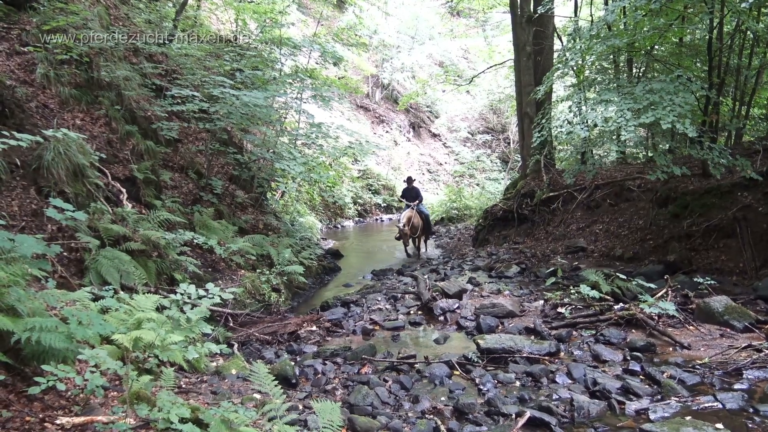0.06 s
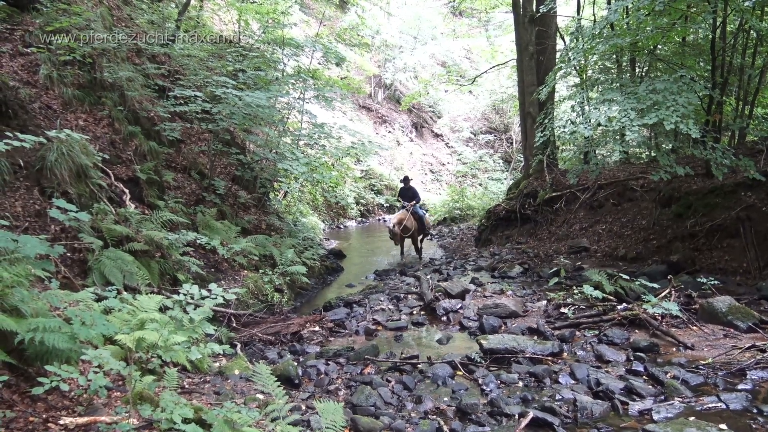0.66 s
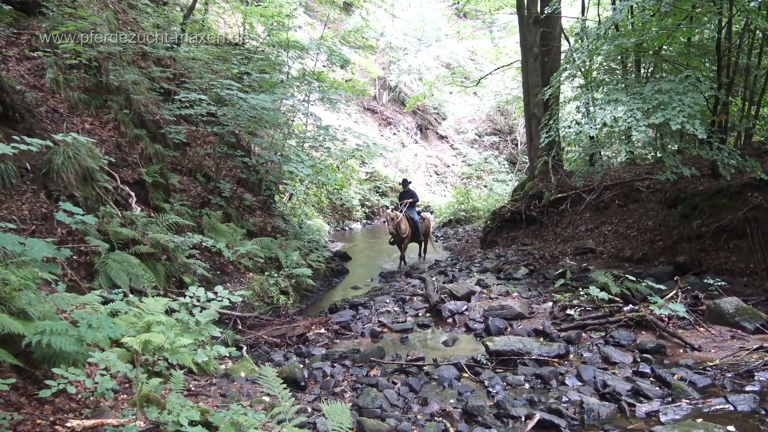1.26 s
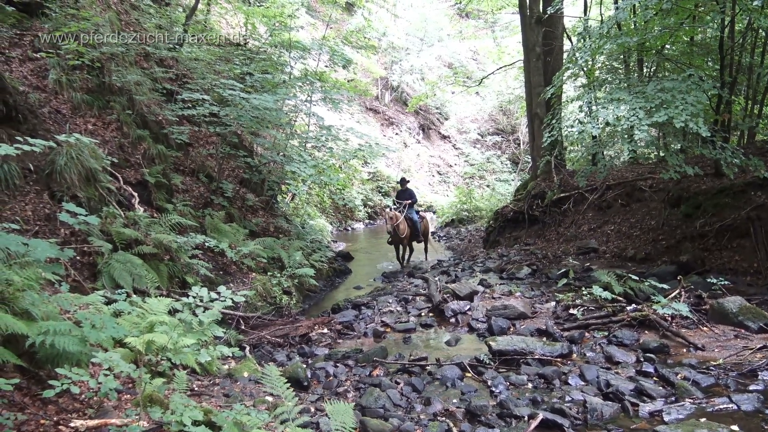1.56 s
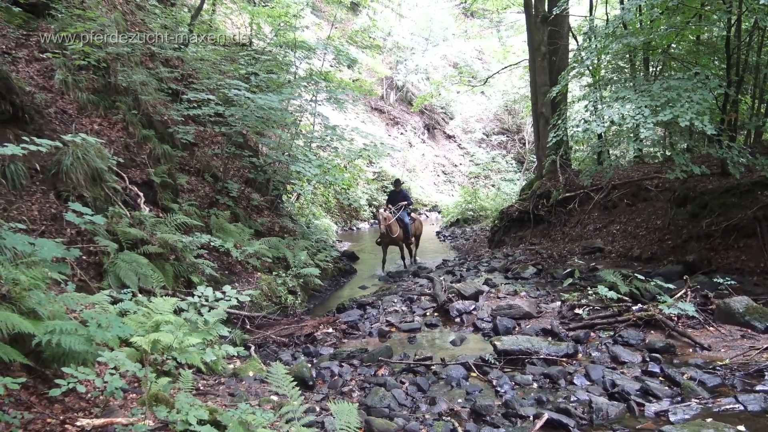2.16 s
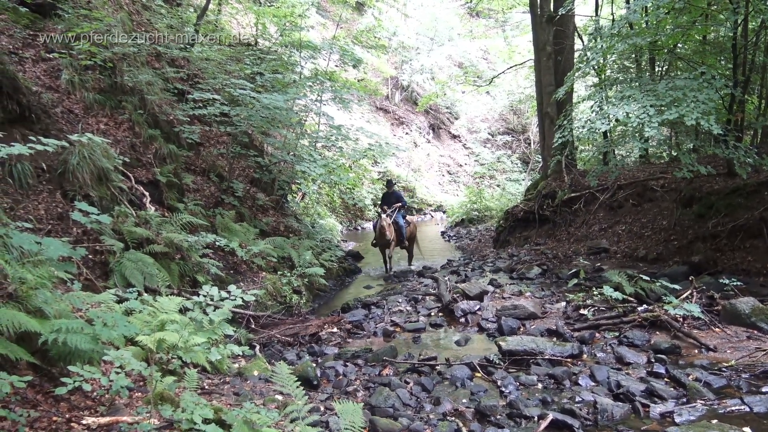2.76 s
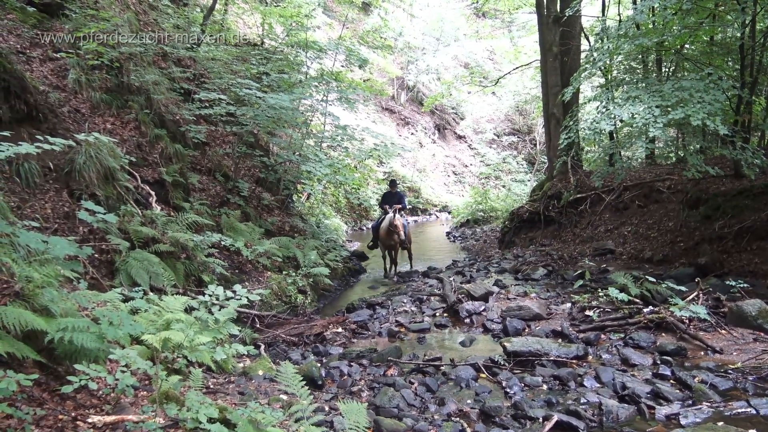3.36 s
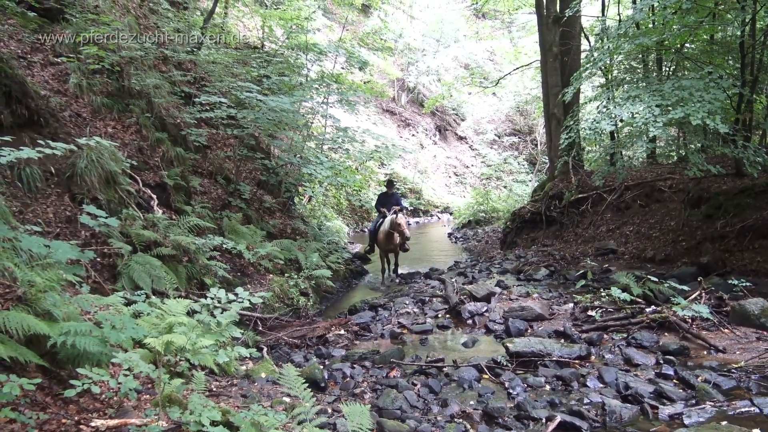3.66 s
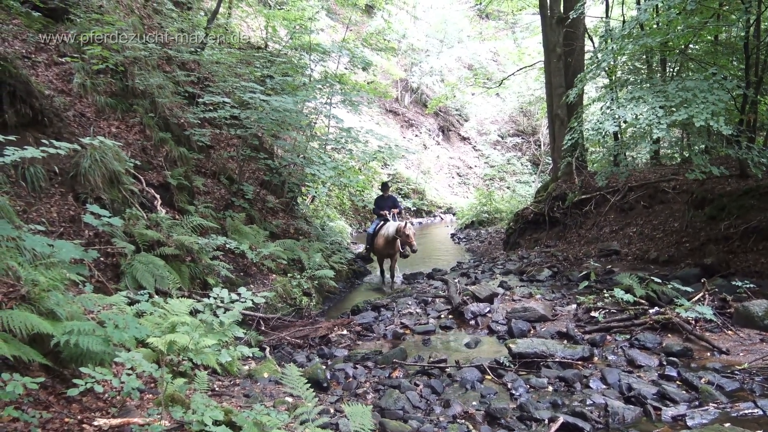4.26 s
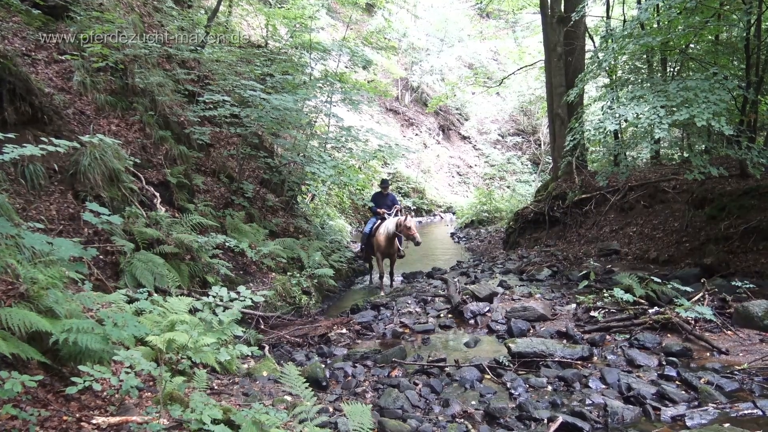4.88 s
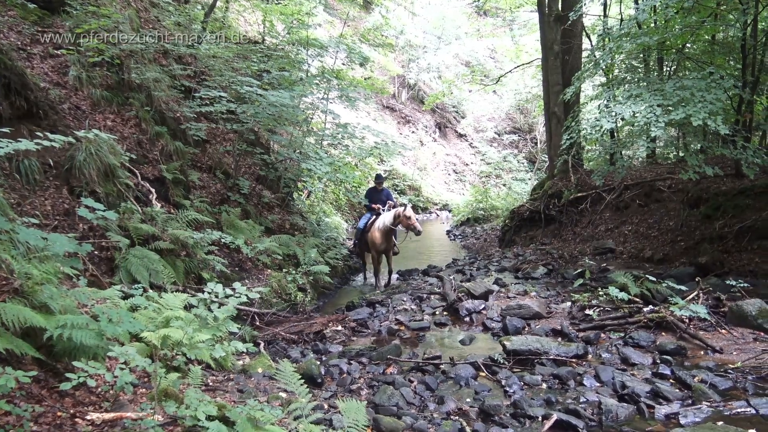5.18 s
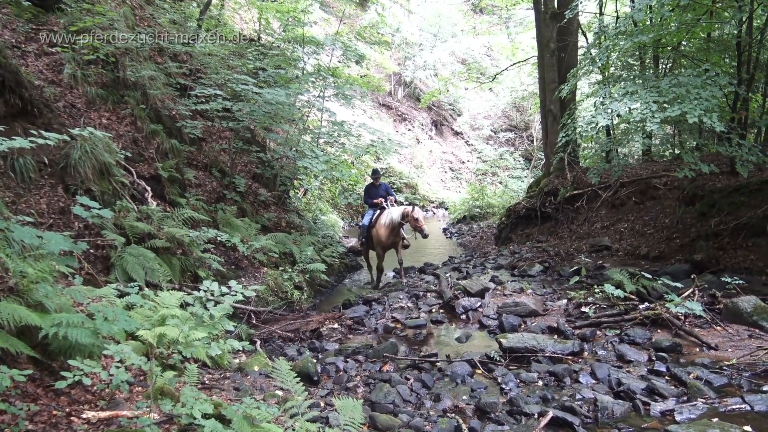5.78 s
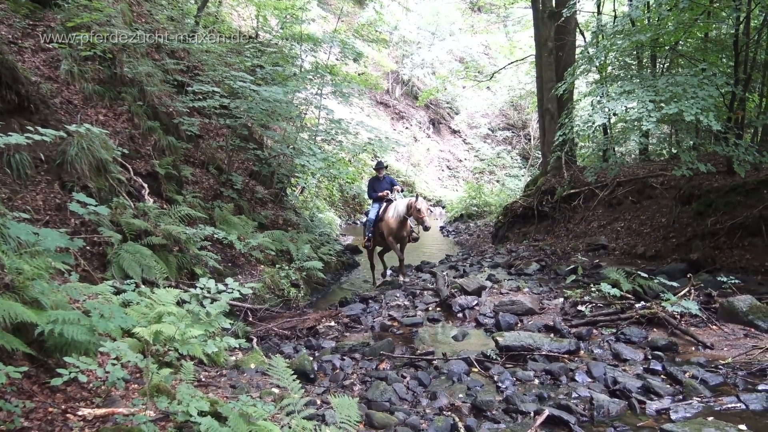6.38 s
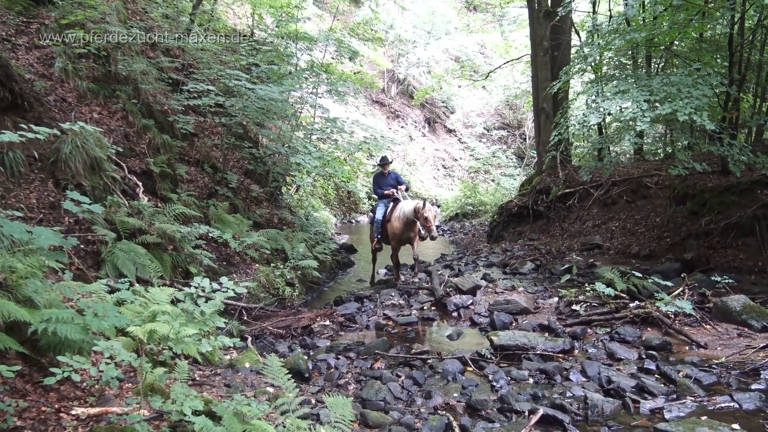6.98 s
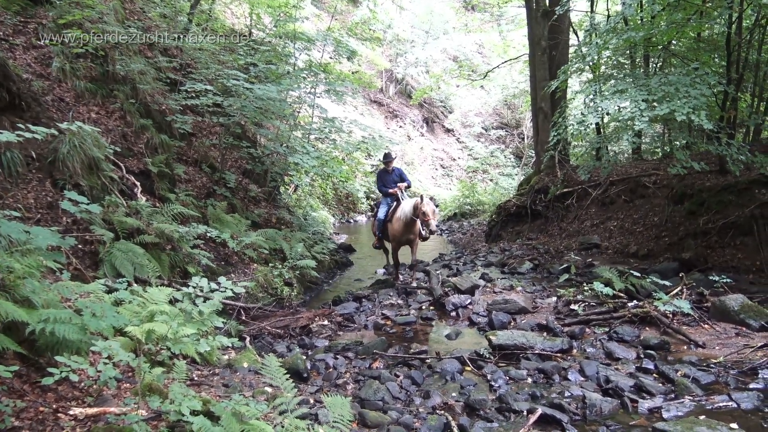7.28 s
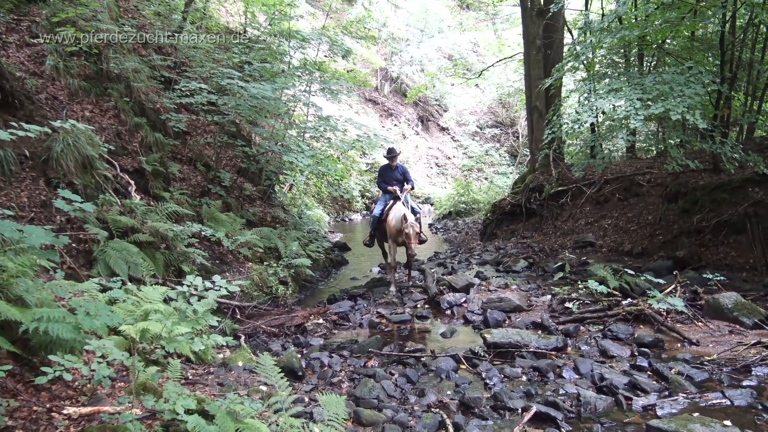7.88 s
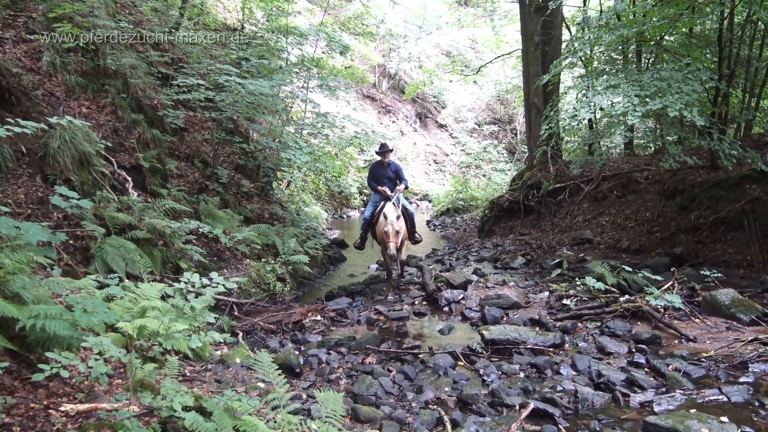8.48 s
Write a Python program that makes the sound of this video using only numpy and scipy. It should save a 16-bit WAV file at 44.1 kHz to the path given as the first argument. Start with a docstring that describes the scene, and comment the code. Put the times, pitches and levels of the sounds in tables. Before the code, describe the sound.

A horse wades through a shallow stream in a wooded ravine, each step sloshing, gurgling and throwing a hiss of drops. Occasional hoof knocks come through the splashes, then grow frequent as it steps onto wet stones. Near the end a shoe strikes rock with one loud, bright crack that rings briefly off the banks. Water trickles softly underneath, all heard in fairly narrow stereo.

```python
"""Splashing, gulping steps: a horse wades down a shallow stream in a wooded ravine, then onto wet stones.
Each leg plunges air under the water, churns up ringing bubbles and sheds a spray of drops.
Hooves knock on the stream bed, most often near the end, where one shoe strikes a rock with a bright
crack that rings round the banks. The stream trickles underneath it all."""
import sys
import numpy as np
from scipy import signal
from scipy.fft import rfft, irfft
from scipy.io import wavfile

SR = 44100
rng = np.random.default_rng(int(sys.argv[2]) if len(sys.argv) > 2 else 0)


def generate_wav(signal):
    """Clip the signal to [-1, 1] and save it as 16-bit WAV at the path in sys.argv[1]."""
    frames = np.transpose(np.atleast_2d(signal))
    scaled = np.clip(frames, -1, 1) * 32767
    pcm = np.round(scaled).astype(np.int16)
    wavfile.write(sys.argv[1], SR, pcm)


N = 385434

# Levels in the tables are relative. A fade time (t60) is how long a sound takes to drop by 60 dB.
# A leg drives air under. Each row: start and length in seconds, level in dB, middle bubble pitch in Hz.
PLUNGES = [(0.467, 0.045, -39.5, 384), (0.917, 0.051, -44, 458), (0.989, 0.059, -37, 303),
           (1.049, 0.057, -49, 166), (1.276, 0.028, -41, 505), (1.36, 0.13, -50, 264),
           (1.673, 0.12, -43.5, 533), (2.158, 0.05, -41, 536), (2.471, 0.045, -41.5, 840),
           (2.556, 0.086, -38, 556), (2.605, 0.04, -43, 161), (2.854, 0.028, -42, 490),
           (2.887, 0.089, -39.5, 690), (2.972, 0.02, -47, 220), (3.136, 0.038, -44, 565),
           (3.293, 0.051, -41, 240), (3.564, 0.1, -42.5, 560), (3.62, 0.022, -46, 171),
           (3.756, 0.051, -43.5, 600), (3.79, 0.029, -50, 191), (4.153, 0.037, -47, 330),
           (4.209, 0.15, -39.5, 414), (4.798, 0.035, -41.5, 335), (5.23, 0.027, -37, 477),
           (5.577, 0.029, -42.5, 275), (5.934, 0.033, -37.5, 378), (6.551, 0.028, -45, 198),
           (7.153, 0.045, -40.5, 804), (7.509, 0.057, -38.5, 1090), (7.762, 0.051, -47, 412),
           (8.168, 0.042, -42.5, 990), (8.451, 0.052, -48, 476)]
# Single large bubbles. Each row: start in seconds, level in dB, pitch in Hz.
PLOPS = [(0.154, -31, 1800), (0.432, -30, 1960), (0.466, -24.5, 320), (0.473, -35, 490), (0.487, -27, 895),
         (0.502, -25, 890), (0.592, -30, 1020), (0.816, -30, 1630), (0.926, -30, 1790), (0.997, -28, 304),
         (1.016, -29, 340), (1.285, -31.5, 800), (1.679, -30, 492), (1.733, -27, 493), (1.756, -33, 278),
         (1.994, -29, 1500), (2.0, -32, 2680), (2.163, -28.5, 383), (2.193, -31, 940), (2.583, -28, 550),
         (2.585, -33, 770), (2.606, -29, 620), (2.611, -31, 810), (2.627, -24, 2540), (2.631, -30, 2900),
         (2.897, -30.5, 710), (2.899, -30, 915), (2.902, -28, 550), (3.144, -30, 1735), (3.285, -29, 342),
         (3.413, -32, 1020), (3.608, -29, 740), (3.618, -26.5, 4260), (3.655, -33, 440),
         (4.161, -32.5, 278), (4.205, -30, 231), (4.224, -26.5, 230), (4.24, -30, 345), (4.254, -30, 1735),
         (4.257, -27, 1155), (4.279, -29, 598), (4.333, -30, 217), (4.654, -31.5, 1030), (4.76, -32, 1610),
         (4.838, -30, 1780), (4.848, -32.5, 960), (4.985, -34, 1125), (5.117, -36.5, 383),
         (5.407, -36, 1030), (5.537, -32.5, 2090), (5.584, -31.5, 238), (5.63, -32.5, 1900),
         (5.823, -36.5, 1800), (5.945, -28, 302), (7.808, -32.5, 274)]
# Splats and ticks of water. Each row: start in seconds, level in dB, fade time in seconds,
# extra brightness in dB per octave.
SPLATS = [(0.817, -36, 0.19, -2.5), (1.481, -29, 0.016, 3), (1.995, -37.5, 0.095, 4), (2.901, -34, .06, 4),
          (3.142, -38, 0.12, 4), (3.979, -28.5, 0.068, 4), (4.024, -32.5, 0.049, 3.5),
          (4.237, -29.5, 0.3, 0), (4.511, -27.5, 0.06, 5.5), (5.102, -43, 0.08, 6),
          (5.178, -28.5, 0.035, 12.5), (5.235, -31.5, 0.11, -5), (5.945, -35.5, 0.35, 4.5),
          (5.59, -40, 0.09, 7), (6.88, -39, 0.03, 9), (7.621, -29.5, 0.04, 1), (8.174, -33, 0.087, 7),
          (8.255, -32.5, 0.022, 18), (8.463, -40, 0.1, 4)]
# A leg sweeps through the water. Each row: start, swell time and spray fade time in seconds,
# then spray level and bubble level in dB.
STRIDES = [(-0.198, 0.097, 1.6, -41, -43.5), (0.132, 0.2, 1.05, -39.5, -45), (0.41, 0.054, 2.3, -41.5, -39),
           (0.69, 0.2, 1.5, -42.0, -48.5), (0.932, 0.1, 2.9, -41.5, -44), (1.5, 0.15, 1.8, -42.5, -45.5),
           (1.947, 0.12, 1.6, -43, -45), (2.143, 0.06, 0.67, -41, -46), (2.362, 0.12, 3.2, -42, -46.5),
           (2.657, 0.083, 3.8, -44.0, -60), (2.832, 0.097, 0.62, -47, -43.5),
           (3.062, 0.11, 1.35, -43.5, -42.5), (3.303, 0.148, 2.9, -43.5, -49),
           (3.561, 0.058, 0.62, -42, -44), (3.76, 0.18, 3.4, -44, -44), (3.975, 0.027, 1.5, -42.5, -58.0),
           (4.224, 0.021, 1.77, -36, -40), (4.505, 0.012, 2.54, -37.5, -42.5),
           (5.174, 0.037, 0.68, -37, -48), (5.384, 0.02, 1.1, -45, -53), (5.57, 0.016, 1.65, -44, -63),
           (5.93, 0.019, 0.8, -39.5, -55), (6.376, 0.17, 0.59, -48.5, -52),
           (6.697, 0.029, 0.35, -48.5, -69), (6.798, 0.08, 1.5, -48, -54), (7.144, 0.025, 3.4, -46.5, -51),
           (7.333, 0.057, 0.93, -45, -38), (7.459, 0.097, 0.67, -37, -50), (8.15, 0.037, 0.65, -42, -39.5),
           (8.402, 0.09, 0.31, -45.5, -48)]
# A hoof lands on stone. Each row: start in seconds, knock level in dB, hoof pitch in Hz,
# then the levels of the bed's thud and the stone's clack in dB.
KNOCKS = [(1.289, -44, 840, -33.5, -50), (2.067, -31, 1100, -40, -23.5), (2.166, -31, 925, -38, -23.5),
          (4.093, -38, 830, -36, -27), (4.209, -26, 925, -38, -35), (4.453, -41, 665, -29.5, -50),
          (4.511, -28, 960, -28.5, -20), (4.805, -34, 996, -33.5, -33), (5.1, -33.5, 1330, -42, -33),
          (5.234, -39, 635, -40, -34), (5.906, -42, 950, -32.5, -38), (6.549, -25, 1000, -31.5, -38),
          (6.716, -33, 930, -27.5, -31), (6.816, -29, 990, -44, -27), (7.034, -39, 617, -32, -32),
          (7.045, -25.5, 910, -35, -23.5), (7.146, -28, 1010, -36, -35), (7.156, -27.5, 980, -40, -35),
          (7.169, -28.5, 940, -55, -42), (7.251, -27.5, 1040, -49, -26), (7.27, -29.5, 1030, -43, -32),
          (7.301, -34, 1140, -44, -26), (7.401, -19.5, 1030, -39, -28), (7.545, -27.5, 990, -40, -26),
          (7.623, -35, 1020, -61, -30), (7.752, -22, 940, -37, -28), (7.761, -22, 780, -29, -17.5),
          (8.068, -33, 860, -38, -28.5), (8.161, -28, 1180, -37, -33), (8.199, -26.5, 1150, -51, -24),
          (8.285, -38, 1070, -55, -30), (8.451, -30, 1130, -34, -30.5)]
# A shoe cracks on a rock. Each row: start in seconds, level in dB.
CRACKS = [(7.8641, -9.5)]
# The notes of a struck stone and of the crack. Each row: pitch in Hz, level in dB, fade time in seconds.
STONE_NOTES = [(1514, 1.5, 0.027), (1766, 4, .028), (1920, -5, 0.024), (2670, 1, 0.017), (3340, -11, 0.013)]
CRACK_NOTES = [(2880, 0, .014), (3110, -1, .013), (3430, -1.5, .012), (3690, -8, .011)]
# The tone colour of each sound. Each row: frequency in Hz, level in dB.
SLOSH_TONE = [(60, -3), (140, -1), (400, -5), (700, -5.5), (980, 2.5), (1300, -13), (1750, -10),
              (2400, -24), (6000, -28)]
SPLAT_TONE = [(100, -11), (400, 7.5), (1800, 8), (5000, 1), (10000, -9.5), (15000, -20)]
SPRAY_TONE = [(400, -15), (1000, -4.5), (1700, 1), (2250, 0), (2900, 0), (4200, -2.5), (5500, -2.5),
              (7500, -5.5), (10000, -8), (12500, -11.5), (15800, -15)]
CHURN_TONE = [(120, -6.5), (250, -6), (400, -2), (600, -2.5), (1000, 1), (1280, -7), (1750, 2), (2250, -11),
              (3000, -8), (5000, -30.5)]
SCRAPE_TONE = [(300, -48), (1000, -35), (1650, 1), (1900, -3), (2200, -7), (2800, -7), (4000, -5),
               (12000, -15)]
TICK_TONE = [(200, -14), (1000, 1), (1700, 4), (2500, 7), (3600, 4), (4400, -1), (6000, -3), (10000, -9),
             (12000, -20), (15800, -22)]
STREAM_TONE = [(25, -15), (45, -6.5), (80, -8.5), (150, -2.5), (240, -1.5), (295, -5.5), (355, -3),
               (430, -8.5), (520, -5.5), (700, -7), (980, -2), (1250, -7.5), (1650, -7.5), (2400, -8),
               (5000, -12.5), (10000, -18.5), (15800, -29)]
# How long the ravine rings. Each row: frequency in Hz, fade time in seconds.
RAVINE_FADE = [(150, .22), (500, .3), (1400, .42), (2500, .46), (3150, .62), (3900, .42), (5000, .32),
               (9000, .24), (15000, .18)]
# Echoes off the banks. Each row: delay in seconds, level in dB.
BANK_ECHOES = [(.0075, -35), (0.0146, -11), (0.0372, -15), (.0475, -13), (0.088, -12.5)]
# How much scattered sound differs between left and right. Each row: frequency in Hz, level in dB.
STEREO_WIDTH = [(60, -5), (250, 2.5), (1000, -8), (2500, -8.5), (5000, -3), (9000, 5.5), (12000, -20),
                (15000, -20)]
# The balance of the two microphones. Each row: frequency in Hz, left minus right in dB.
MIC_BALANCE = [(60, 0), (180, 1.2), (700, 2.3), (1400, 3.8), (2900, 2.8), (5500, 1.4), (10000, .1),
               (15000, 0)]


def plunges(level_db=-2.5, per_s=220, scatter_octaves=1.512, climb_octaves=0.85, fade_db=4, slosh_db=-4.5):
    """Air pushed under breaks into big bubbles, the deep ones tending to come first; water sloshes shut."""
    out, t = np.zeros(N), np.arange(SR // 4) / SR
    for start, length, db, middle_hz in PLUNGES:
        cluster = np.zeros(len(t))
        count = int(length * per_s) + 2
        for k, (delay, size, up, down) in enumerate(rng.random((256, 4))[:count]):
            progress = (k + delay) / count
            hz = middle_hz * 2 ** (scatter_octaves * (up - down) + climb_octaves * (progress - .5))
            strength = (-1) ** k * (.5 + size) * amp(-fade_db * progress) * np.sqrt(hz)
            add(cluster, progress * length, strength * bubble(hz, cycles=16, rise=0.28))
        slosh = colour(rng.standard_normal(len(t)), SLOSH_TONE)
        slosh *= np.interp(t / length, [0, .15, .8, 1.5], [0, 1, 1, 0])
        gulp = unit_rms(cluster) + amp(slosh_db) * unit_rms(slosh)
        add(out, start, amp(db + level_db) * gulp * np.sqrt(length / t[-1]))
    return out


def plops(level_db=-2.5, spatter_db=-7):
    """Lone bubbles ring out, each with a wet spatter round its pitch; deep ones ring for fewer cycles."""
    out, t = np.zeros(N), np.arange(SR // 10) / SR
    for start, db, hz in PLOPS:
        ring = bubble(hz, cycles=34 * (hz / 1600) ** 0.64, rise=0.066)
        around_pitch = [(hz / 2, -22), (hz, 0), (hz * 2, -22), (SR, -44)]
        spatter = colour(noise_burst(t, t60=0.043), around_pitch)
        add(out, start, amp(db + level_db) * unit_peak(ring))
        add(out, start, amp(db + level_db + spatter_db) * unit_peak(spatter))
    return out


def splats():
    """Sudden splats and bright ticks of water: hoof slaps, spray and a drip."""
    out, t = np.zeros(N), np.arange(SR // 2) / SR
    for start, db, t60, brightness in SPLATS:
        tone = [(hz, level + brightness * np.log2(hz / 2000)) for hz, level in SPLAT_TONE]
        splat = unit_rms(colour(rng.standard_normal(len(t)), tone))
        add(out, start, amp(db) * splat * fade(t, t60))
    return out


def knocks(clack_db=-3, scrape_db=-11, grit_db=-27, thud_cycles=8.9, hoof_t60=.021):
    """The hollow hoof knocks, the stone clacks and scrapes, the bed thuds, and grit shifts underfoot."""
    out, t = np.zeros(N), np.arange(SR // 8) / SR
    for start, knock_db, hoof_hz, bed_db, stone_db in KNOCKS:
        # every stone, and the bed under it, is tuned a little differently
        bed_hz = 252 * 2 ** rng.uniform(-0.56, 0.56)
        tuning = 2 ** rng.uniform(-0.12, 0.12)
        blow = amp(grit_db) * noise_burst(t, t60=.05)
        blow[0] += 1  # the sharp hit ahead of the grit
        hoof = sum(gain * note(t, hoof_hz * ratio, hoof_t60)
                   for ratio, gain in [(1, 1), (0.776, -0.57), (1.22, -0.53)])
        knock = signal.fftconvolve(blow, hoof)[:len(t)]
        bed_t60 = thud_cycles / bed_hz
        thud = note(t, bed_hz, bed_t60) - 0.96 * note(t, bed_hz * 1.92, bed_t60 / 2)
        clack = ringing(t, STONE_NOTES, tuning)
        scrape = unit_peak(colour(noise_burst(t, t60=.05), SCRAPE_TONE))
        add(out, start, amp(knock_db) * unit_peak(knock))
        add(out, start, amp(bed_db) * unit_peak(thud))
        add(out, start, amp(stone_db + clack_db) * (clack + amp(scrape_db) * scrape))
    return out


def shoe_crack(tick_db=-7.5):
    """Iron hits bare rock: a tick and a very short, bright ring."""
    out, t = np.zeros(N), np.arange(SR // 8) / SR
    ring = ringing(t, CRACK_NOTES)
    tick = unit_peak(colour(noise_burst(t, t60=0.015), TICK_TONE))
    for start, db in CRACKS:
        add(out, start, amp(db) * (ring + amp(tick_db) * tick))
    return out


def stirring(bubbles_linger=1.41):
    """How loud spray and churn are over time: both swell as a leg sweeps; bubbles settle more slowly."""
    t, spray_power, churn_power = np.arange(N) / SR, 0, 0
    for start, swell_s, t60, spray_db, bubbles_db in STRIDES:
        swell = np.clip((t - start) / swell_s, 0, 1)
        settling_s = np.maximum(t - start - swell_s, 0)
        spray_power += swell * (amp(spray_db) * fade(settling_s, t60)) ** 2
        churn_power += swell * (amp(bubbles_db) * fade(settling_s, t60 * bubbles_linger)) ** 2
    return np.sqrt(spray_power), np.sqrt(churn_power)


def spray(gain, level_db=1.0, mist_db=-1):
    """Drops thrown up by the legs patter back onto the water in a hiss of mist."""
    drops = bubble_swarm(910, 15160, per_s=6000, cycles=6.1, spread_db=1.5, sizes=24)
    mist = amp(mist_db) * rng.standard_normal(N)
    return amp(level_db) * gain * unit_rms(colour(drops + mist, SPRAY_TONE))


def churn(gain, froth_db=-2.3, foam_db=-8, drip_db=-9.0):
    """Water folds in behind the legs: a thick, foamy gurgle, and plinks where big drops fall back."""
    gurgle = bubble_swarm(250, 4500, per_s=600, cycles=19, spread_db=3.3, sizes=40)
    plinks = bubble_swarm(850, 3800, per_s=60, cycles=32, spread_db=2.2, sizes=37)
    foam = amp(foam_db) * rng.standard_normal(N)
    froth = unit_rms(colour(gurgle + foam, CHURN_TONE))
    return gain * (amp(froth_db) * froth + amp(drip_db) * plinks)


def stream(level_db=-49.0, trickle_db=-3):
    """Shallow water trickles between stones over a smooth, distant wash."""
    wash = rng.standard_normal(N)
    trickle = bubble_swarm(375, 15600, per_s=1500, cycles=13.3, spread_db=3.0, sizes=20)
    return amp(level_db) * unit_rms(colour(wash + amp(trickle_db) * trickle, STREAM_TONE))


def ravine(sound, tail_db, echo_db, side_db, build_s=0.0009, reflections_per_s=14000):
    """Rocks and trunks scatter the sound into a fading stereo tail; the banks send back clear echoes."""
    reflections = rng.standard_normal((2, SR)) * (rng.random((2, SR)) < reflections_per_s / SR)
    hz, t, spectrum = signal.stft(reflections, SR, nperseg=256)
    spectrum *= fade(t, look_up(RAVINE_FADE, hz)[:, None])
    tail = signal.istft(spectrum, SR, nperseg=256)[1]
    tail *= 1 - np.exp(-np.arange(tail.shape[1]) / SR / build_s)
    centre, side = amp([[tail_db], [side_db]]) * tail / np.linalg.norm(tail[0])
    centre[0] += 1  # the sound that arrives directly
    for delay, db in BANK_ECHOES:
        add(centre, delay, amp([db + echo_db]))
    side = colour(side, STEREO_WIDTH)
    return signal.fftconvolve(sound[None], np.array([centre + side, centre - side]), axes=1)[:, :N]


def bubble(hz, cycles, rise=0.074):
    """A pocket of air swells, then rings for some cycles, its pitch rising as it nears the surface."""
    age = np.linspace(0, 1, int(cycles * SR / hz) + 8)
    swell = 1 - np.exp(-2 * cycles * age)
    return np.sin(2 * np.pi * cycles * age * (1 + rise * age)) * swell * fade(age, 1)


def bubble_swarm(low_hz, high_hz, per_s, cycles, spread_db, sizes):
    """Bubbles of many sizes ring at random times, most of them faint, a few strong."""
    out = np.zeros(N)
    count = int(per_s * N / SR / sizes) + 1
    for hz in np.geomspace(low_hz, high_hz, sizes):
        when, luck, flip = rng.random((4096, 3))[:count].T
        levels_db = spread_db * np.minimum(-np.log(1 - luck), 4)
        strengths = unit_rms(amp(levels_db)) * np.sign(flip - .5)
        ring = hz * bubble(hz, cycles)
        positions = (when * N).astype(int)[:, None] + np.arange(len(ring))
        out += np.bincount(positions.ravel(), np.outer(strengths, ring).ravel(), N)[:N]  # mix them in
    return unit_rms(out)


def ringing(t, notes, tuning=1):
    """A struck object rings; neighbouring notes swing opposite ways, keeping it to a narrow band."""
    return unit_peak(sum((-1) ** k * amp(db) * note(t, hz * tuning, t60)
                         for k, (hz, db, t60) in enumerate(notes)))


def note(t, hz, t60):
    """One dying vibration."""
    return np.sin(2 * np.pi * hz * t) * fade(t, t60)


def noise_burst(t, t60):
    """A hiss that starts at once and dies away."""
    return rng.standard_normal(len(t)) * fade(t, t60)


def fade(t, t60):
    """A gain that drops by 60 dB every t60."""
    return amp(-60 * t / t60)


def colour(sound, tone, size=4096):
    """Gives a sound a tone colour. The filter never rings ahead of a hit, so hits stay sharp."""
    log_gain = np.log(amp(look_up(tone, abs(np.fft.fftfreq(size, 1 / SR)))))
    response = np.exp(np.conj(signal.hilbert(log_gain)))
    taps = np.fft.ifft(response).real[:size // 2]
    return signal.oaconvolve(sound, taps)[:len(sound)]


def look_up(table, hz):
    """Reads between the rows of a table, on a scale of octaves."""
    row_hz, values = np.transpose(table)
    return np.interp(np.log(hz + 1), np.log(row_hz + 1), values)


def add(mix, start, sound):
    """Mixes a sound in at a start time in seconds."""
    part = mix[round(start * SR):][:len(sound)]
    part += sound[:len(part)]


def amp(db):
    """Turns decibels into a gain."""
    return 10 ** (np.asarray(db) / 20)


def unit_rms(sound):
    """Scales the average strength (rms) to 1."""
    return sound / np.sqrt(np.mean(sound ** 2) + 1e-20)


def unit_peak(sound):
    """Scales the highest peak to 1."""
    return sound / (abs(sound).max() + 1e-12)


def scene():
    """Water and steps sound low down in the stream bed; the crack sets the whole ravine ringing."""
    spray_gain, churn_gain = stirring()
    water = stream() + spray(spray_gain) + churn(churn_gain)
    water = ravine(water, tail_db=-15, echo_db=-16, side_db=-15)
    # the microphone's low cut thins the deep bass of the steps
    low_cut = [(30, -11), (70, -9), (130, 2.0), (220, 0.5), (15000, 0.5)]
    steps = colour(plunges() + plops() + splats() + knocks(), low_cut)
    steps = ravine(steps, tail_db=-9.0, echo_db=-15.5, side_db=-27.5)
    crack = ravine(shoe_crack(), tail_db=-1.5, echo_db=-1.5, side_db=-19)
    return steps + crack + water


def record(dry):
    """Two close microphones, the left a little louder in the middle range, lose the highest treble."""
    lean_db = look_up(MIC_BALANCE, np.fft.rfftfreq(N, 1 / SR))
    pair = irfft(rfft(dry) * amp(np.array([lean_db, -lean_db]) / 2), N)
    low_pass = signal.firwin(511, cutoff=15850, window=("kaiser", 9), fs=SR)
    return signal.oaconvolve(pair, low_pass[None], "same")


dry = scene()
out = record(dry)
generate_wav(out)
```